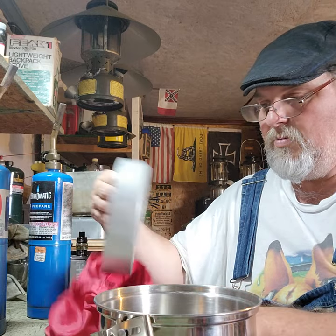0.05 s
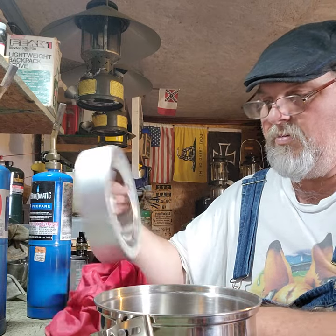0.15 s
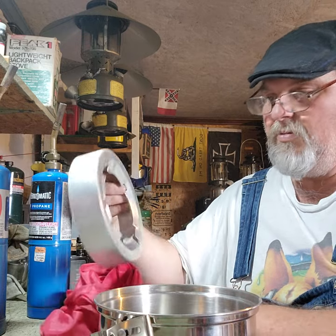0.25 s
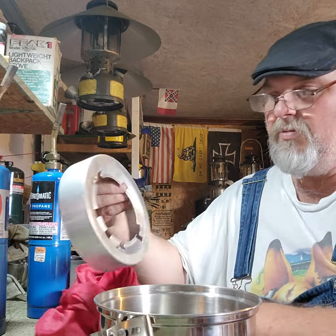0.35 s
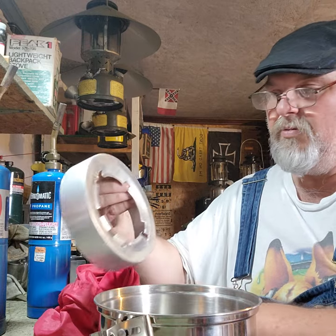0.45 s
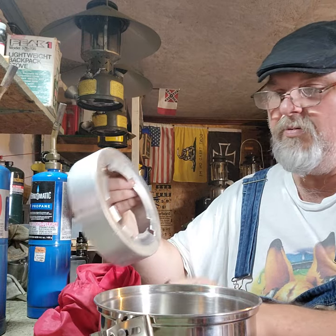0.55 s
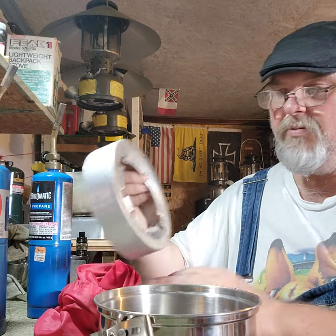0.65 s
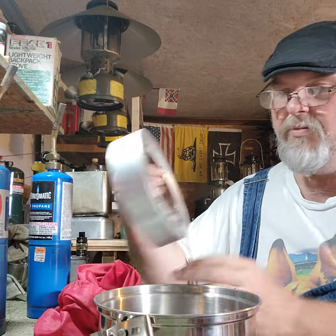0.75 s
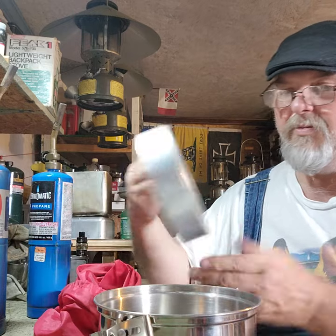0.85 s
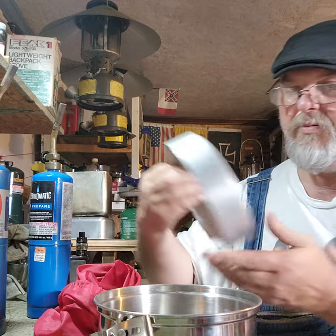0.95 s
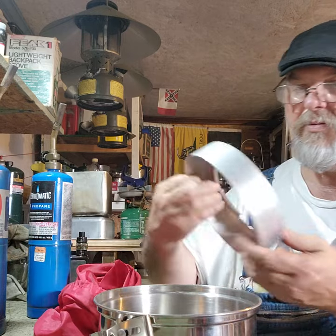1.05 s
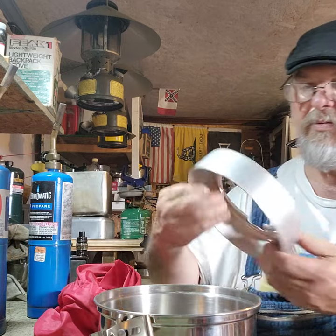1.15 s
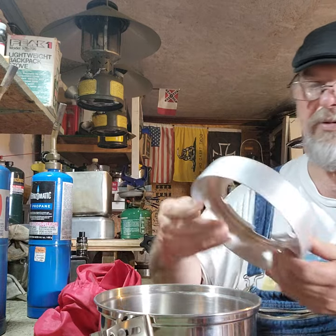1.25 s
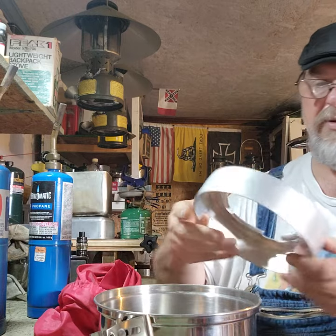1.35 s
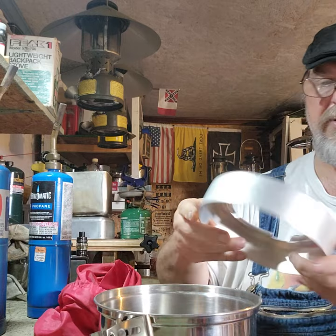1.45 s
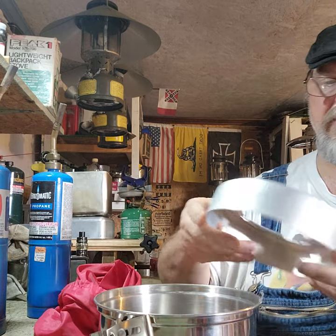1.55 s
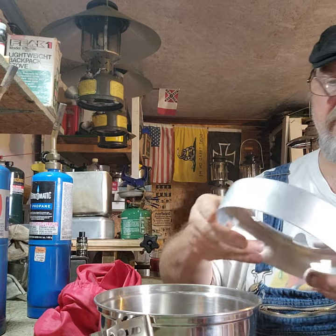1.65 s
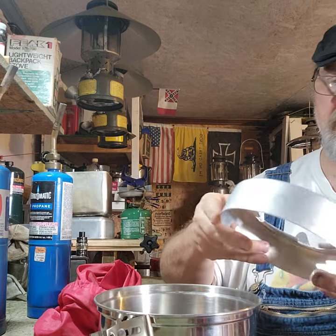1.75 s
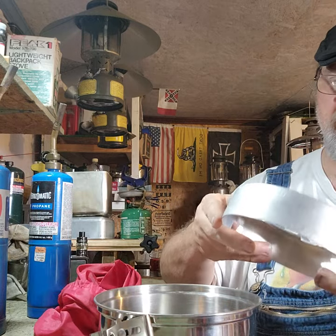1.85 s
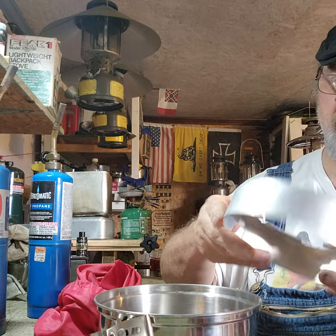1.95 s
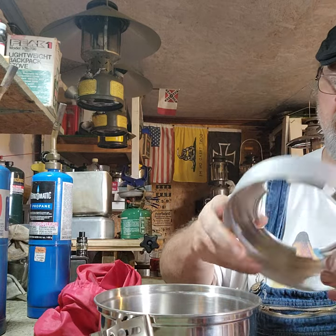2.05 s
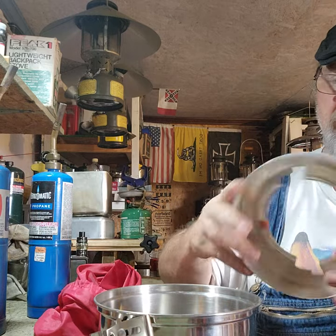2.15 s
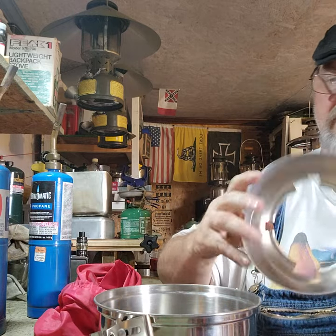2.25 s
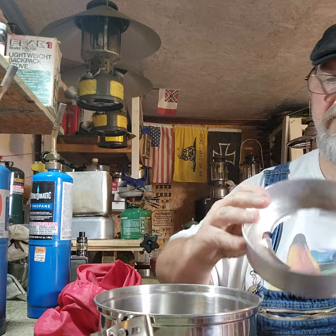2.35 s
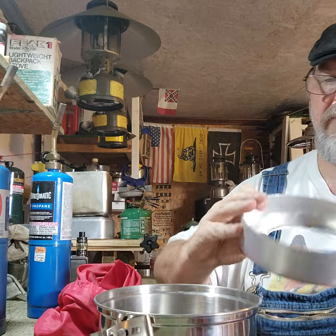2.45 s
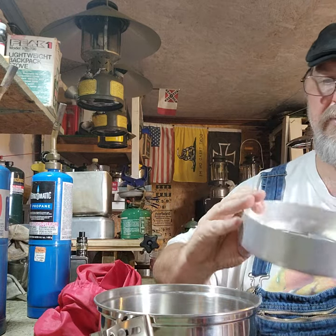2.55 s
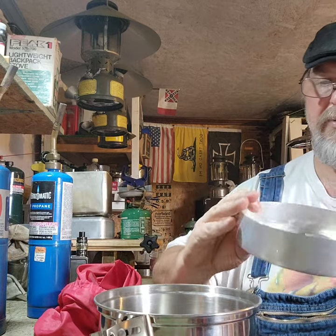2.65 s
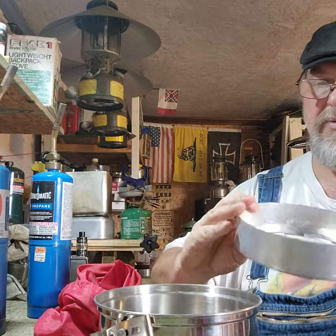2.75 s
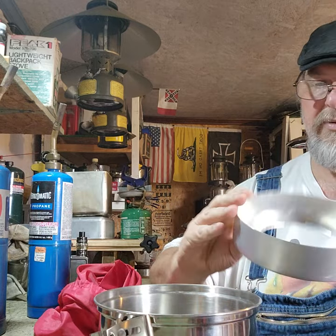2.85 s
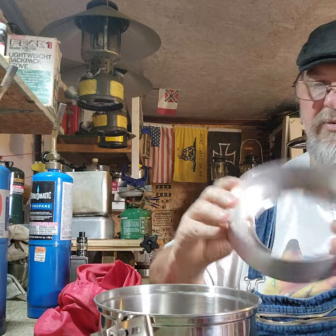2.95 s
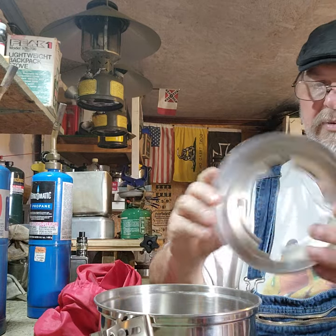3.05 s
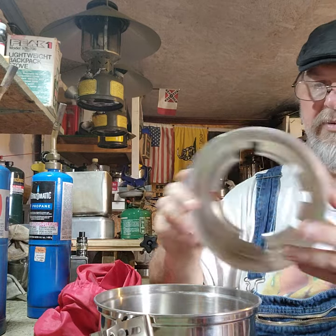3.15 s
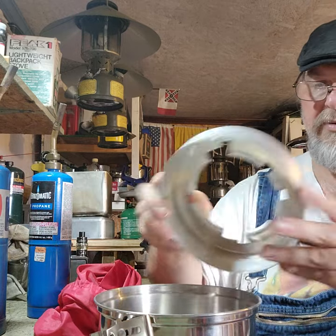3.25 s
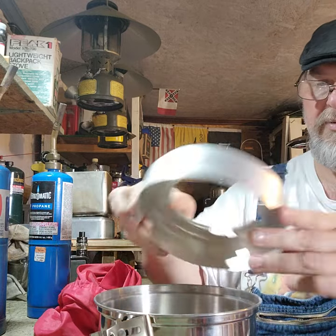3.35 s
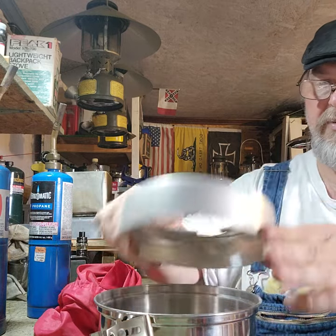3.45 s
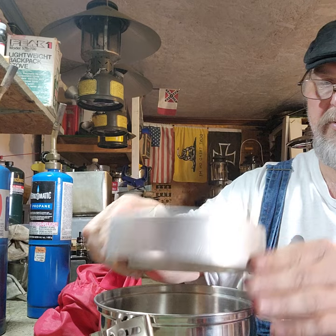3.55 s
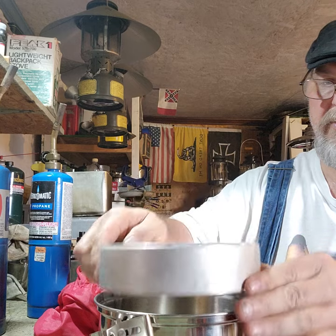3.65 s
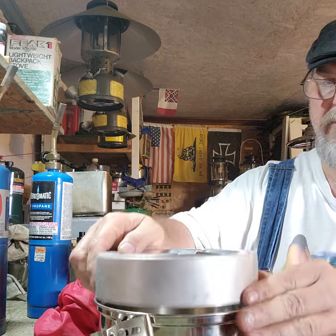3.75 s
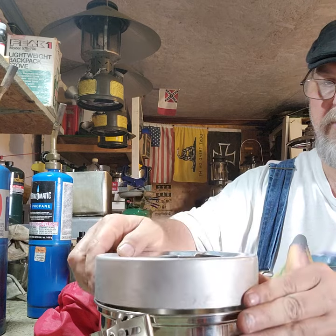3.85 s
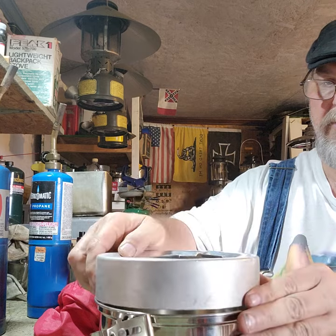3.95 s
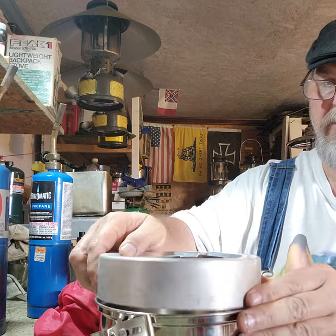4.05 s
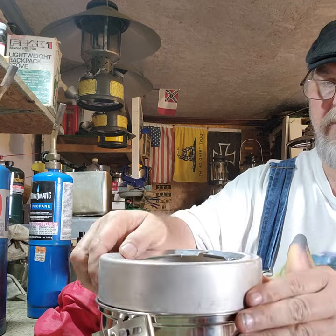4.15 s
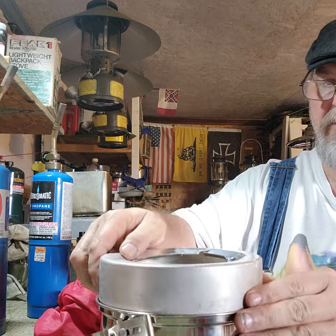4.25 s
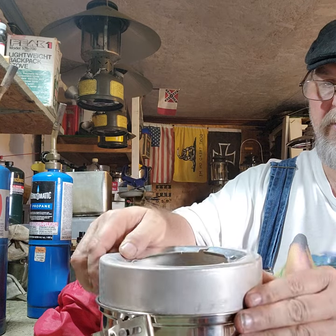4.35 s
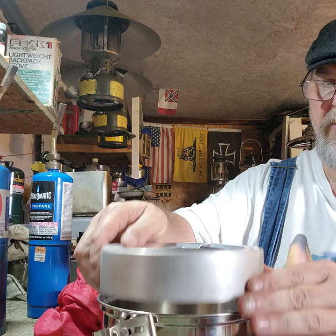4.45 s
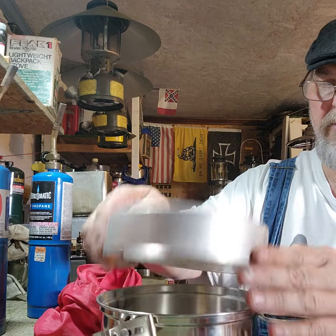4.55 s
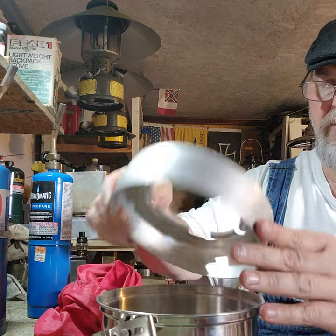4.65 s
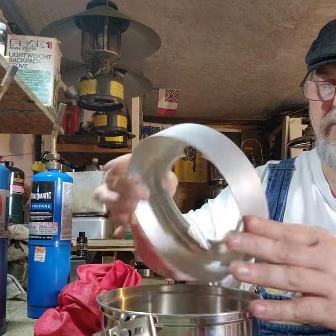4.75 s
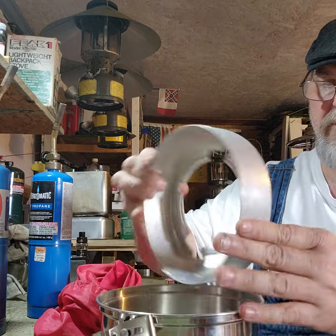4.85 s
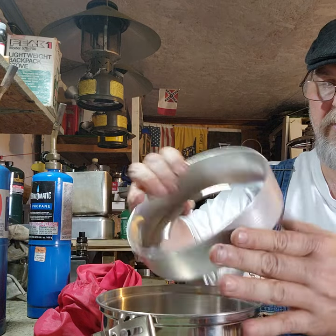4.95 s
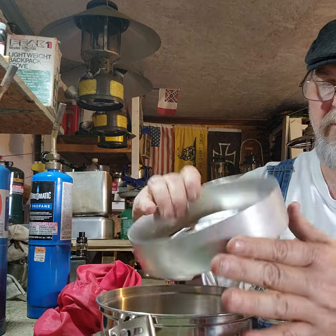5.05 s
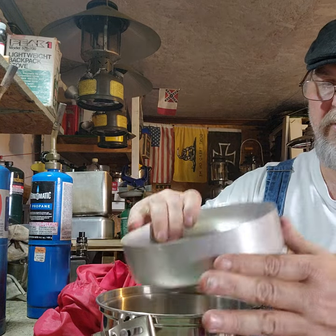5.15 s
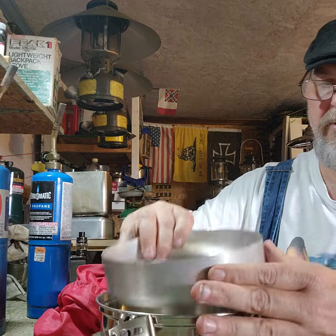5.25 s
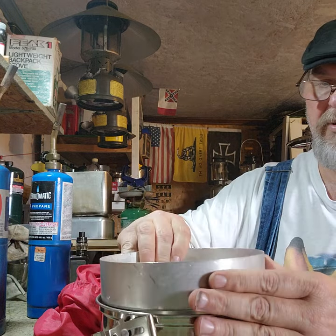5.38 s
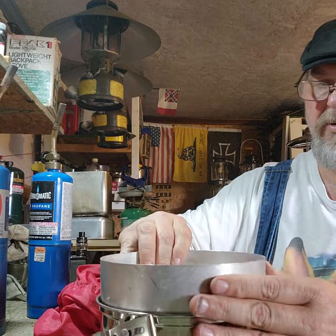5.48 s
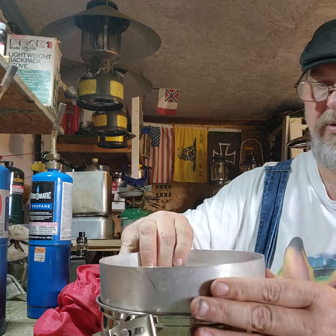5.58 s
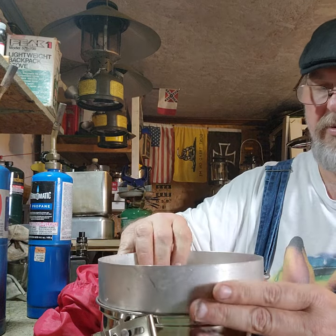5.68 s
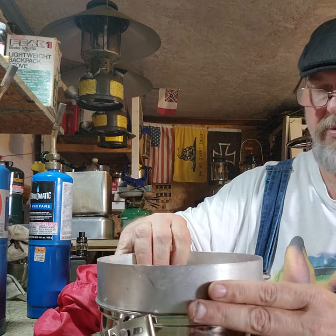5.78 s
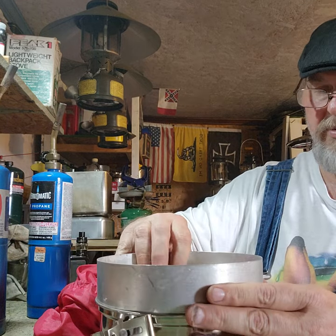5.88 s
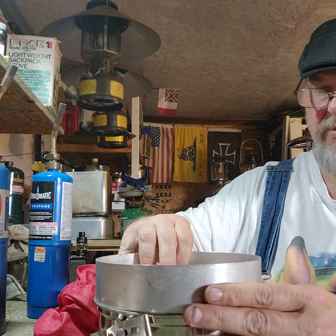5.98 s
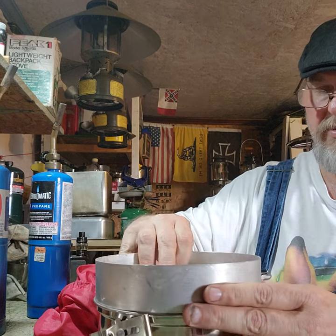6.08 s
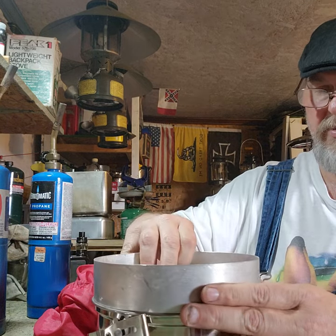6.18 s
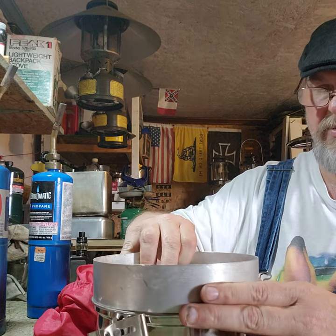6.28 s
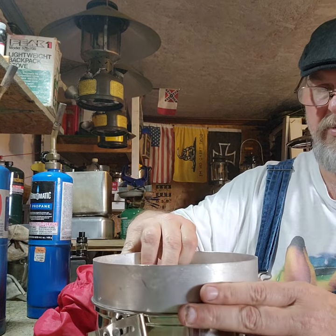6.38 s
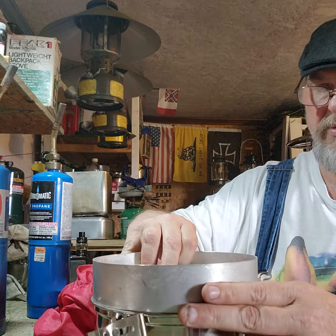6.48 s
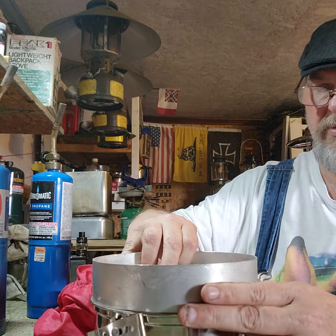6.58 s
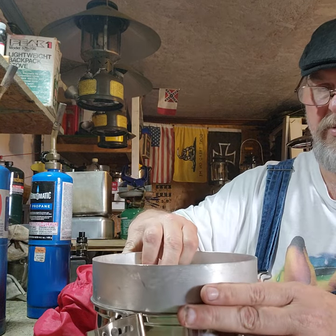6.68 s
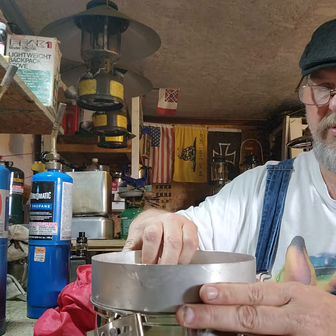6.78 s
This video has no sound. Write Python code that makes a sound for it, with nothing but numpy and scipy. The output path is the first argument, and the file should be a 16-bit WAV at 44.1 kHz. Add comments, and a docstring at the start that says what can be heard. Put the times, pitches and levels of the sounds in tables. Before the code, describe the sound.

Quiet finger rubbing on metal gives way to clanks of a ring on a pot, dull bench bumps, and a distant engine revving up.

```python
"""A thin metal ring is rubbed in the fingers in a small workshop, over an engine drone outside that slowly sags.
Then the ring is set on a steel pot with a run of knocks, and the pot bumps on the wooden bench.
Something drags in jerks over the bench as the engine revs up; two harder knocks follow, and road roar swells late.
Knocks and jolts excite decaying modes, strokes are grainy friction through the metal's modes,
the engine is three wavering sines, and the road and the room air are shaped noise."""
import sys
import numpy as np
from scipy import signal
from scipy.fft import rfft, irfft, next_fast_len
from scipy.io import wavfile
from scipy.ndimage import uniform_filter1d

SR = 44100
rng = np.random.default_rng(int(sys.argv[2]) if len(sys.argv) > 2 else 0)


def wav_record(signal):
    """Record a signal, one row per channel, as 16-bit PCM in the file named by sys.argv[1]."""
    frames = np.transpose(np.atleast_2d(signal))
    bounded = np.clip(frames, -1, 1)
    # unit amplitude maps onto the largest positive 16-bit level
    quanta = np.round(bounded * 32767).astype(np.int16)
    wavfile.write(sys.argv[1], SR, quanta)


N = 300850

# Modes of ring and pot together. Each row: pitch in Hz, relative level in dB, free ring time (t60) in seconds.
METAL_MODES = [(540, -8, .1), (615, 0, .1), (712, -7, .07), (1090, -16, .22), (1367, -5, .1),
               (1403, -7, .09), (1507, -8, .19), (1745, -8, .15), (1870, -14, .15), (1975, -9, .12),
               (2215, -12, .14), (2345, -10, .15), (2110, -12, .1), (2417, -31, .75), (2560, -11, .14),
               (2690, -12, .14), (2845, -17, .5), (3165, -8, .15), (3385, -16, .3), (3478, -9, .13),
               (3607, -8, .11), (3680, -9, .11), (3930, -12, .1), (3973, -13, .17), (4080, -11, .16),
               (4310, -12, .15), (4890, -7, .09), (5910, -4, .12), (7520, -4, .09)]
# Modes of the wooden bench top. Each row: pitch in Hz, relative level in dB, free ring time (t60) in seconds.
BENCH_MODES = [(113, -1, .25), (167, 3.5, .2), (222, -6, .17), (272, -9, .15), (388, -7, .12)]


def amp(db):
    """Decibels to gain."""
    return 10 ** (np.asarray(db) / 20)


def evened(x):
    """Scales to rms 1."""
    return x / np.sqrt(np.mean(x ** 2) + 1e-20)


def read(points, hz):
    """Reads a curve of (Hz, value) points on a log-frequency axis."""
    f, value = np.transpose(points)
    return np.interp(np.log(hz + 1), np.log(f + 1), value)


def follow(s, values):
    """Draws straight lines through values at times s, over the whole scene."""
    return np.interp(np.arange(N) / SR, s, values)


def above(hz, corner_hz, order):
    """Gain that climbs to 1 above the corner."""
    ratio = (hz / corner_hz) ** order
    return ratio / (1 + ratio)


def below(hz, corner_hz, order):
    """Gain that is 1 well below the corner and falls away above it."""
    return 1 / (1 + (hz / corner_hz) ** order)


def add(mix, s, sound):
    """Mixes a sound in at time s."""
    part = mix[round(s * SR):][:len(sound)]
    part += sound[:len(part)]


def shaped(x, gain):
    """Filters by a function of frequency."""
    size = next_fast_len(x.shape[-1])
    spectrum = rfft(x, size) * gain(np.fft.rfftfreq(size, 1 / SR))
    return irfft(spectrum, size)[..., :x.shape[-1]]


def wander(rate_hz, count):
    """Slow random curves of about rms 1."""
    steps = np.arange(0, N / SR + 1, .25 / rate_hz)
    slow = uniform_filter1d(rng.standard_normal((count, len(steps))), size=4, axis=1)
    return [follow(steps, evened(row)) for row in slow]


def modes(table, favoured_hz=(), boost_db=0., ring=0.85):
    """Half a second of decaying sines from chance phases; a grip leaves them a share (ring) of the free ring time."""
    hz, db, t60 = np.transpose(table)[:, :, None]
    t = np.arange(SR // 2) / SR
    for centre in favoured_hz:  # modes near a favoured pitch ring louder
        db = db + boost_db * np.exp(-(np.log(hz / centre) / .014) ** 2)
    db = db + 1.5 * rng.standard_normal(hz.shape)  # no two blows alike
    decay = amp(db - 60 * t / (t60 * ring))
    rings = decay * np.sin(2 * np.pi * (hz * t + rng.random(hz.shape)))
    return rings.sum(0) / np.sqrt(len(table))


def soft(sound, rise_s):
    """Eases an onset in: a heavy body takes a moment to start moving."""
    return sound * (1 - np.exp(-np.arange(len(sound)) / SR / rise_s))


def knocks():
    """Each contact is a quick run of bounces into the metal, a jolt to the bench and a chattering crack."""
    # Metal on metal. Each row: start in seconds, metal gain in dB, bench gain in dB, crack gain in dB,
    # treble lift of the crack in dB, share of the free ring time that the grip allows,
    # then the pitches in Hz of the modes struck squarely.
    contacts = [(3.775, -27.5, -28, -33, -21, 0.66, 1367, 2345, 1507, 540),
                (3.844, -24, -35.5, -39, 2, 0.55, 3607, 3680),
                (3.995, -26, -35, -35, -5, 0.56, 3165, 4080, 3478, 3680),
                (4.023, -28, -28.5, -43, 5.5, 0.44, 3680, 540, 2215),
                (4.077, -32.5, -35.5, -45, 35, 0.34, 3165, 3980, 540, 3478),
                (5.314, -14, -22, -21.5, 3.5, 0.9, 4890, 1507, 718, 3930),
                (5.478, -13.5, -30.5, -26.5, 6.5, 0.72, 1380, 2417, 3950)]
    # Spectrum of the crack. Each row: frequency in Hz, relative density in dB per Hz.
    crack_spectrum = [(250, -2.5), (620, -3), (950, -7), (1500, -8.5), (3800, -11.5), (8000, -20)]
    bounce_s = .009  # time scale of the bounces and of the crack
    dulling = 1  # dB lost by the upper modes for each dB that a blow is softer than the hardest
    hardest_db = max(row[1] for row in contacts)
    out, t = np.zeros(N), np.arange(8192) / SR
    for s, metal_db, bench_db, crack_db, treble_db, ring, *square_hz in contacts:
        metal = soft(modes(METAL_MODES, square_hz, boost_db=13.0, ring=ring), rise_s=.0016)
        dull_db = dulling * (metal_db - hardest_db)
        metal = shaped(metal, lambda hz: amp(dull_db * above(hz, 5500, 8)))
        for size, delay in zip((.2, 1, .35, .25), (0, .3, 1.0, 2.1)):  # a graze, the blow, two rebounds
            add(out, s + delay * bounce_s * rng.uniform(.8, 1.0), size * amp(metal_db) * metal)

        add(out, s, amp(bench_db) * soft(modes(BENCH_MODES), rise_s=.008))

        noise = rng.standard_normal(len(t))
        crack = shaped(noise, lambda hz: amp(read(crack_spectrum, hz) + treble_db * above(hz, 5000, 4)))
        chatter = amp(3.5 * evened(uniform_filter1d(rng.standard_normal(len(t)), size=60)))
        swell = (1 - np.exp(-t / (.15 * bounce_s))) ** 2
        fade = np.exp(-t / (1.83 * bounce_s))
        add(out, s + .1 * bounce_s, amp(crack_db) * evened(crack) * chatter * swell * fade)
    return out


def bumps():
    """The pot bumps and drags in jerks on the bench: each jolt feeds its modes, a dull edge and a faint metal tick."""
    # Pot on bench. Each row: start in seconds, gain in dB, gain of the dry woody edge in dB relative to that.
    jolts = [(1.332, -71, 21.5), (3.622, -52, -4.5), (3.796, -22, -20), (4.434, -39, -18), (4.494, -36, -9),
             (4.504, -23, -9), (4.522, -24, -24), (4.535, -27, -3), (4.546, -21, -17), (4.575, -22, -17),
             (4.596, -27, -10), (4.622, -33, -11), (4.643, -30, -12), (4.67, -29, -19), (4.709, -29, -14),
             (5.612, -39, -33), (5.718, -34, -10), (5.731, -29, -9), (6.78, -40, -12)]
    tick_hz, tick_db = 4020, -19  # the rim tick favours modes near this pitch; its gain relative to the jolt
    out, t = np.zeros(N), np.arange(2048) / SR
    for s, db, edge_db in jolts:
        add(out, s, amp(db) * soft(modes(BENCH_MODES, ring=0.55), rise_s=.003))
        add(out, s, amp(db + tick_db) * modes(METAL_MODES, [tick_hz], boost_db=10, ring=.25))
        edge = shaped(rng.standard_normal(len(t)), lambda hz: below(hz, 520, 2.3))
        add(out, s, amp(db + edge_db) * evened(edge) * soft(np.exp(-t / .009), rise_s=.001))
    return out


def rubbing():
    """Each stroke is grainy friction: it feeds the metal's modes, scuffs, and hisses on the skin."""
    # Fingers and rims sliding. Each row: middle in seconds, length in seconds, metal gain in dB,
    # skin hiss gain in dB, then the pitches in Hz of the modes left free to ring.
    strokes = [(0.034, 0.1, -61, -69.5, 2380), (0.116, 0.022, -62, -71, 2845),
               (1.032, 0.091, -73.5, -57.5, 3680), (1.117, 0.07, -59, -63, 2845, 2560, 1745, 3680),
               (1.167, .015, -68, -60, 2560), (1.366, 0.045, -58.5, -57, 2330, 1745, 4310),
               (1.495, .15, -68.5, -60, 2310), (2.133, 0.19, -63.5, -58, 4310, 1745),
               (2.32, 0.2, -68, -58, 3680), (2.855, 0.1, -60.5, -61, 4890), (2.989, 0.15, -69, -60.5, 2350),
               (3.117, 0.21, -68, -63.5, 1745), (3.288, 0.09, -54.5, -52.5, 4060, 1745, 1090),
               (3.51, .08, -70, -60, 4080), (3.654, 0.076, -60.5, -66, 3980),
               (3.719, 0.051, -64, -61.5, 4320), (4.663, 0.16, -62.5, -59, 2690),
               (4.78, 0.13, -59, -55, 1870), (4.947, 0.15, -63, -56, 2280),
               (5.113, 0.083, -58, -55.5, 1870), (5.169, 0.12, -75, -53.5, 4160),
               (5.286, 0.12, -60, -55.5, 1760), (5.39, .18, -50, -57, 3385), (5.735, 0.09, -55, -67, 3950),
               (5.87, .05, -55, -64, 3680, 2345, 1745), (6.033, 0.05, -68, -62),
               (6.335, 0.07, -65, -68, 3950, 1385), (6.799, 0.11, -65, -67, 3950)]
    grain_db = 3  # unevenness of friction from one few-millisecond patch to the next
    lands_s = 3.6  # until then the ring hangs in the fingers
    held_ring, resting_ring = 1.05, .55  # share of the free ring time, in the fingers and near the pot
    out = np.zeros(N)
    for s, length, metal_db, hiss_db, *free_hz in strokes + fidgets(count=14):
        size = round(length * SR)
        patches = evened(uniform_filter1d(rng.standard_normal(size), size=300))
        grip = np.sin(np.pi * np.linspace(0, 1, size) ** .65) ** 2  # quick to grip, slow to let go
        press = grip * evened(amp(grain_db * patches))
        spikes = amp(3 * np.minimum(rng.exponential(1, size), 4))
        friction = evened(rng.standard_normal(size) * spikes)

        share = held_ring if s < lands_s else resting_ring
        ring = modes(METAL_MODES, free_hz, boost_db=14.0, ring=share)
        ring = shaped(ring, lambda hz: above(hz, 1100, 4) * below(hz, 5300, 8))
        sung = signal.fftconvolve(press * friction, ring / np.linalg.norm(ring))
        scuff = evened(shaped(friction, lambda hz: above(hz, 1500, 2) * below(hz, 6000, 4)))
        hiss = evened(shaped(friction, lambda hz: above(hz, 8500, 3) * below(hz, 15000, 4)))
        dry_rub = press * (amp(metal_db - 19) * scuff + amp(hiss_db) * hiss)

        start = s - .42 * size / SR  # the strongest press comes before halfway
        cut = max(round(-start * SR), 0)  # a stroke already under way at the start loses its head
        add(out, max(start, 0), amp(metal_db) * sung[cut:])
        add(out, max(start, 0), dry_rub[cut:])
    return out


def fidgets(count):
    """Stroke rows for faint shifts of grip, one somewhere in each equal share of the handling time."""
    from_s, to_s, length_s, metal_db, hiss_db = 1.05, 6.4, .3, -71, -67
    starts = from_s + (to_s - from_s) * (np.arange(count) + rng.random(count)) / count
    return [(s, length_s, metal_db, hiss_db) for s in starts]


def engine():
    """The firing tone and two faint overtones, wavering in pitch and strength."""
    # Engine outside. Each row: time in seconds, firing rate in Hz, level in dB,
    # strain as the level of the third harmonic in dB relative to that.
    revs = [(0, 101, -61, -30), (.3, 98, -56.5, -31.5), (.7, 90.5, -60.5, -33), (1.6, 87.5, -63.5, -21.5),
            (2.298, 86.5, -63.5, -17.5), (4.421, 81.5, -58, -15.5), (4.75, 104, -54.5, -9.5),
            (5.2, 109.5, -51, -34), (5.898, 109, -49, -30), (6.499, 104, -48.5, -28),
            (6.82, 104, -45.5, -33)]
    second_db = -1  # second harmonic relative to the third
    waver_hz, waver_db = 9, 1.8  # unsteadiness of the drone
    s, *columns = np.transpose(revs)
    hz, level_db, strain_db = (follow(s, column) for column in columns)
    levels_db = level_db, level_db + strain_db + second_db, level_db + strain_db
    jitter, *wavers = wander(waver_hz, count=4)
    turns = np.cumsum(hz * (1 + 0.00488 * jitter)) / SR
    lead = np.array([[.3], [0]])  # radians: the drone reaches the left port first
    out = np.zeros((2, N))
    for k, (db, waver) in enumerate(zip(levels_db, wavers), 1):
        out += np.sqrt(2) * amp(db + waver_db * waver) * np.sin(2 * np.pi * k * turns + lead)
    return out


def road():
    """Distant traffic: dark, patchy noise that follows a slow level curve."""
    # Swell of the road roar. Each row: time in seconds, level in dB.
    swell = [(0, -74.5), (.45, -84.5), (3.398, -68.5), (5.899, -59.5), (6.4, -59), (6.7, -65.5)]
    # Spectrum of the road roar. Each row: frequency in Hz, relative density in dB per Hz.
    roar_spectrum = [(40, 5), (150, 10), (400, -10), (1400, -10), (3000, -35), (8000, -51)]
    return amp(follow(*np.transpose(swell))) * diffuse(roar_spectrum, patchy_db=3.5)


def room_air():
    """The room's steady bed of noise, with only slight drifting patches."""
    # Spectrum of the room air. Each row: frequency in Hz, relative density in dB per Hz.
    air_spectrum = [(25, -7), (50, 1), (100, 6), (200, -13.5), (600, -11.5), (1000, -18), (2000, -16),
                    (4200, -16.5), (8000, -25.5), (16000, -20)]
    return amp(-64) * diffuse(air_spectrum, patchy_db=1.37)


def diffuse(spectrum, patchy_db):
    """Two-channel noise of rms 1 with drifting patches, alike in the bass as long waves are."""
    # Left-right likeness of distant sound. Each row: frequency in Hz, likeness from 0 to 1.
    likeness = [(130, 0.98), (290, 0.96), (640, 0.42), (1400, 0.32), (3000, 0)]
    frames, hz = N // 256 + 5, np.fft.rfftfreq(1024, 1 / SR)
    a, b, c, d, patches = rng.standard_normal((frames, 513, 5)).T
    patches = uniform_filter1d(uniform_filter1d(patches, size=12, axis=0), size=14, axis=1)
    same = read(likeness, hz)[:, None]
    left, other = a + 1j * b, c + 1j * d
    z = np.array([left, same * left + np.sqrt(1 - same ** 2) * other])
    z *= amp(read(spectrum, hz)[:, None] + patchy_db * evened(patches))
    return evened(signal.istft(z, nperseg=1024, noverlap=768)[1][:, :N])


def shop(x):
    """The workshop's tail: sparse taps of random sign, each band dying at its own speed."""
    # Reverberation of the workshop. Each row: frequency in Hz, decay time (t60) in seconds.
    decay = [(200, 0.36), (1500, 0.22), (5000, 0.22), (14000, 0.1)]
    taps = np.zeros((2, SR // 2))
    starts = np.arange(160, SR // 2 - 20, 20)  # one tap at a chance place in every 20 samples
    at = starts + rng.integers(0, 20, (2, len(starts)))
    np.put_along_axis(taps, at, rng.choice([-1., 1.], at.shape), 1)
    hz, t, z = signal.stft(taps, SR, nperseg=256)
    fade = amp(-60 * t / read(decay, hz)[:, None])
    tail = signal.istft(z * fade, SR, nperseg=256)[1]
    return signal.fftconvolve(x[None], tail / np.linalg.norm(tail[0]), axes=1)[:, :N]


def scene():
    """Bench-top sounds reach the two ports with a phase lead and a room tail; the rest is distant."""
    # Lead of the left port for bench-top sounds. Each row: frequency in Hz, phase lead in radians.
    phase_lead = [(0, .35), (780, .2), (1350, -4.9), (1980, -6.3), (3500, -7.4), (4800, -5.1), (5770, -7.6),
                  (10200, -19), (16500, -30)]
    handling = knocks() + bumps() + rubbing()
    near = shaped(handling, lambda hz: above(hz, 80, 3))  # small things radiate no deep bass
    left = shaped(near, lambda hz: np.exp(1j * np.interp(hz, *np.transpose(phase_lead))))
    tail = shop(near)
    # long waves are alike at both ports
    apart = shaped(tail[0] - tail[1], lambda hz: .5 * above(hz, 700, 2))
    wet = amp(-6.5) * (tail.mean(0) + np.outer([1, -1], apart))
    return np.array([left, near]) + wet + engine() + road() + room_air()


def record(dry):
    """Port resonances of the microphones, the right one more exposed; then the band limit."""
    # Port resonances. Each row: frequency in Hz, gain in dB.
    resonances = [(5000, 3.5), (5500, -3), (6800, -3.5), (8000, 1.5), (10400, -5), (11800, 7), (15500, 1)]
    # Balance of the two ports. Each row: frequency in Hz, left minus right in dB.
    balance = [(100, -.7), (700, -2.5), (1300, -4.5), (2400, -4), (4400, -2.5), (8100, -4), (13000, -7)]
    edge_hz = 15900
    coloured = shaped(dry, lambda hz: amp(read(resonances, hz) + np.outer([.5, -.5], read(balance, hz))))
    band_limit = signal.firwin(511, edge_hz, window=("kaiser", 9), fs=SR)
    return signal.oaconvolve(coloured, band_limit[None], "same")


dry = scene()
out = record(dry)
wav_record(out)
```